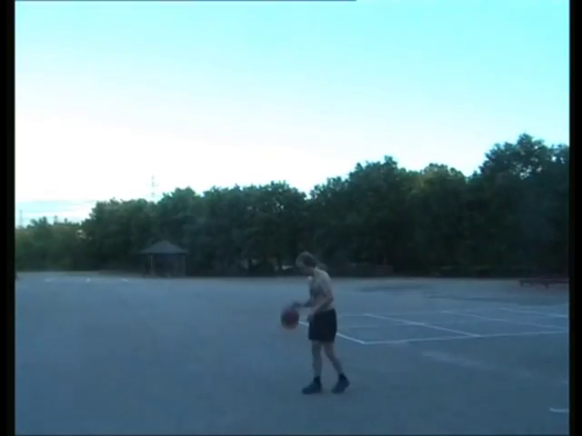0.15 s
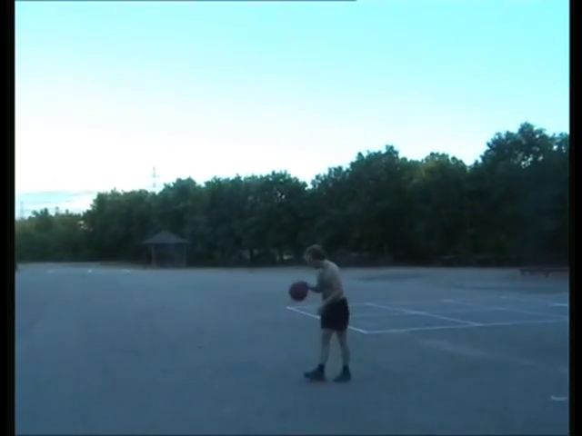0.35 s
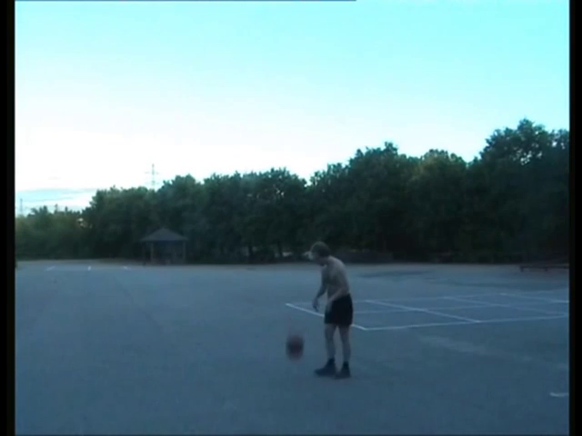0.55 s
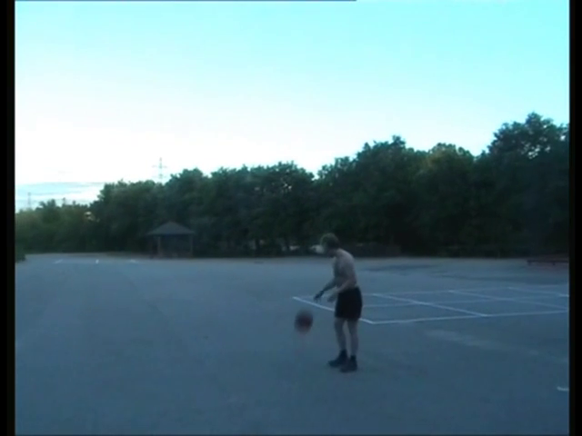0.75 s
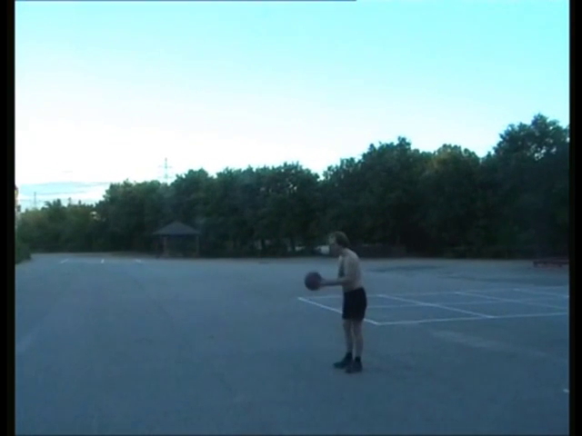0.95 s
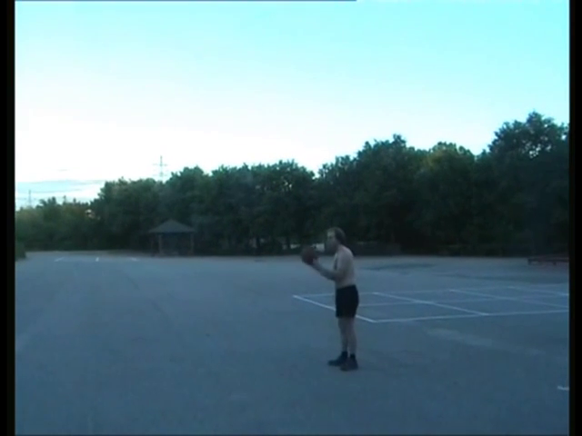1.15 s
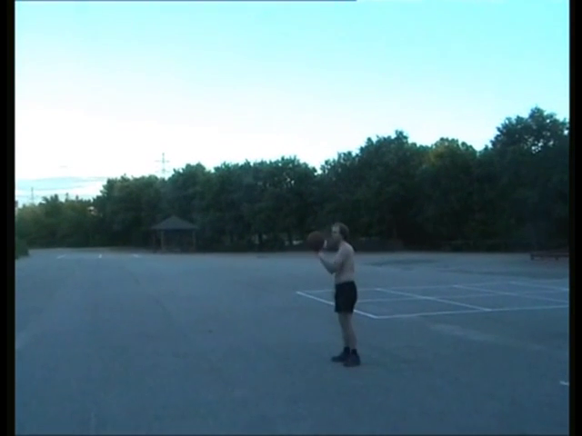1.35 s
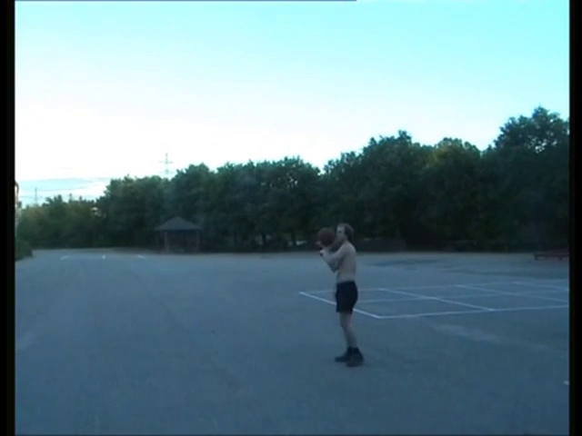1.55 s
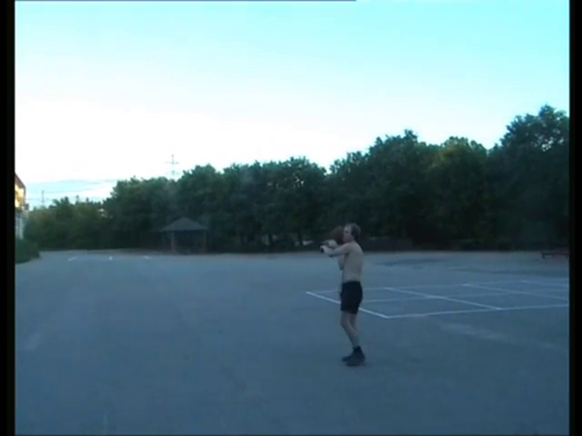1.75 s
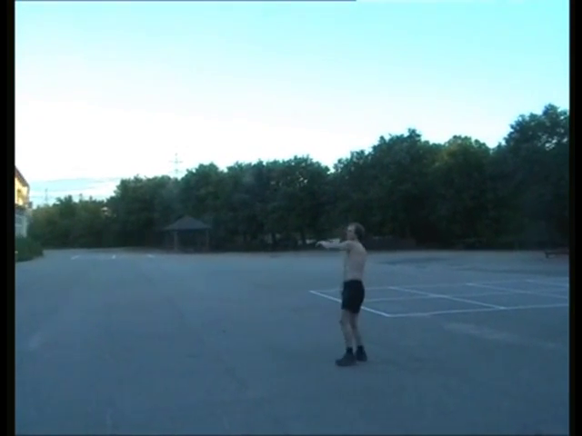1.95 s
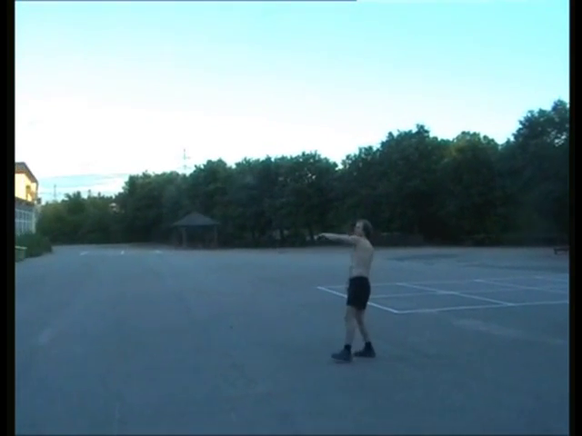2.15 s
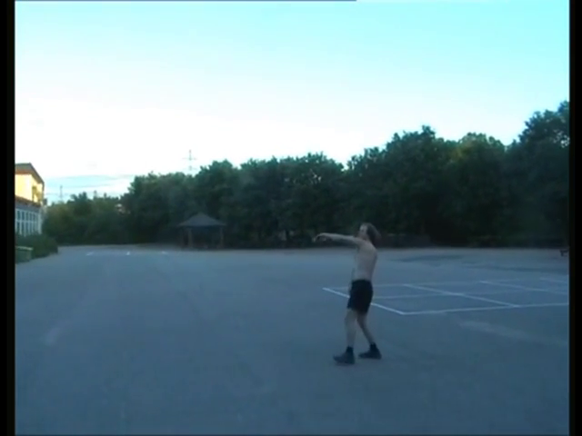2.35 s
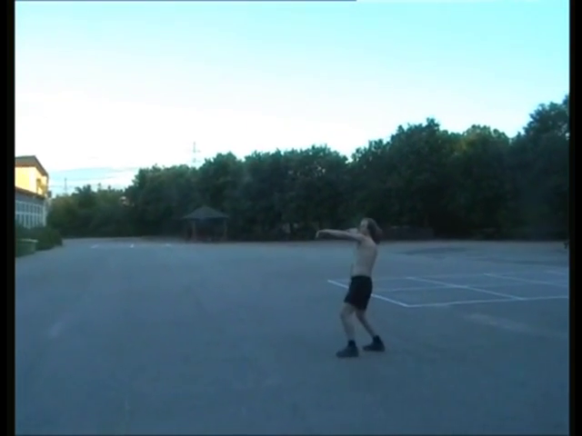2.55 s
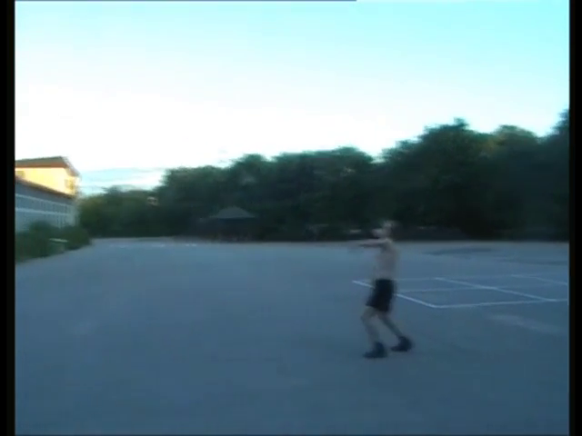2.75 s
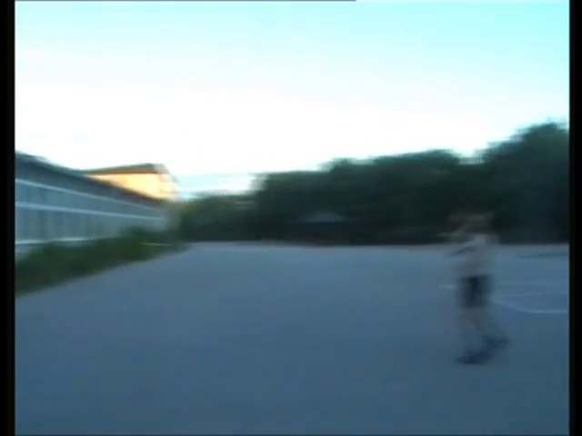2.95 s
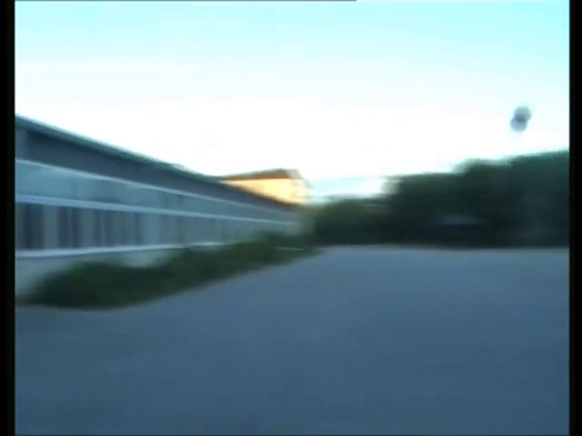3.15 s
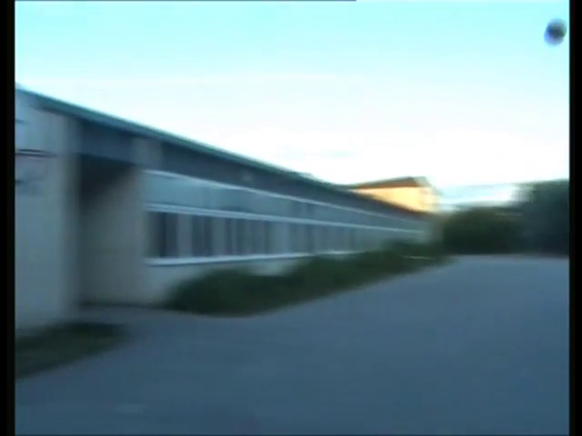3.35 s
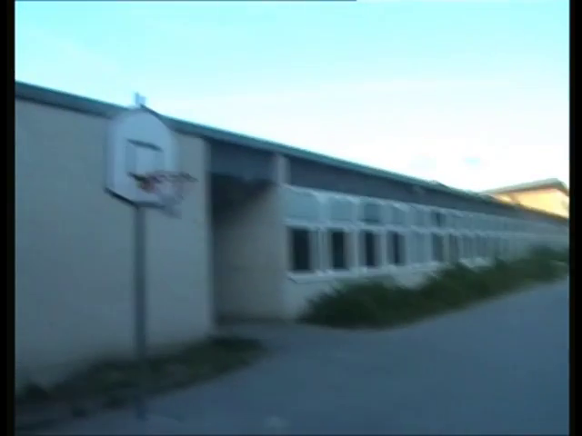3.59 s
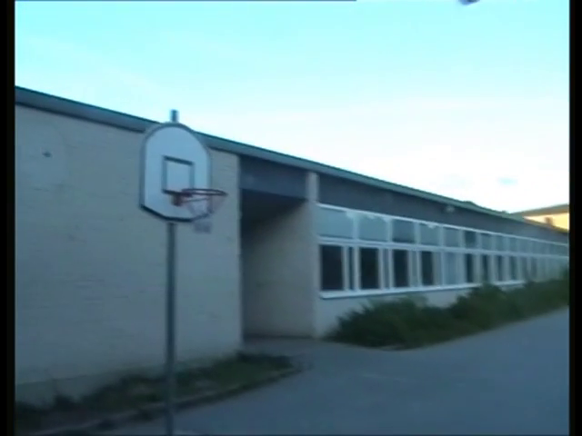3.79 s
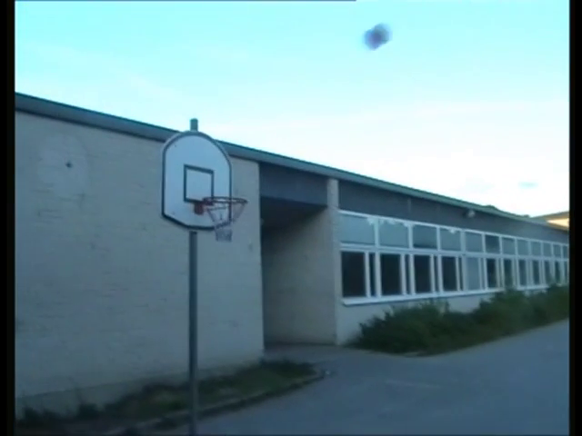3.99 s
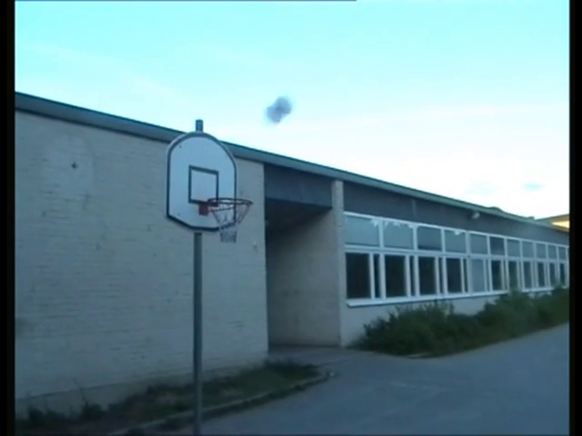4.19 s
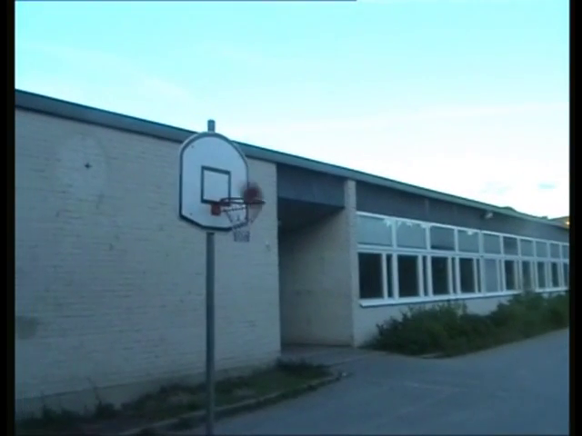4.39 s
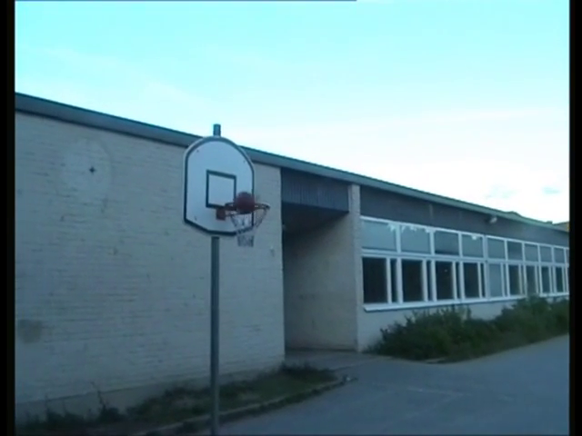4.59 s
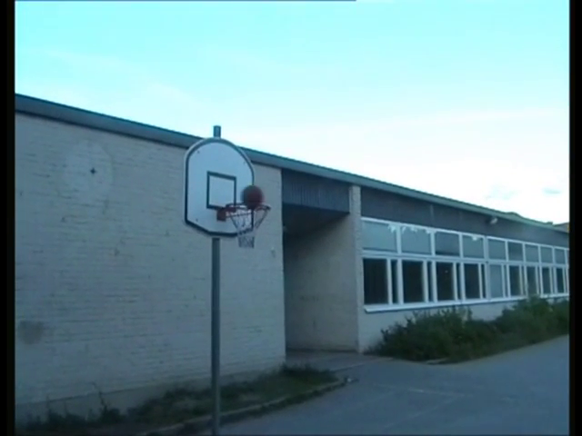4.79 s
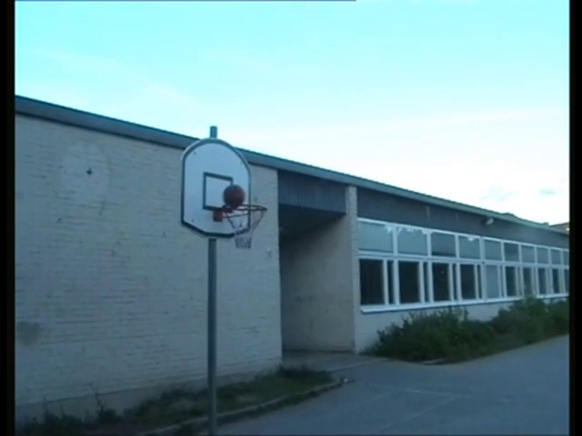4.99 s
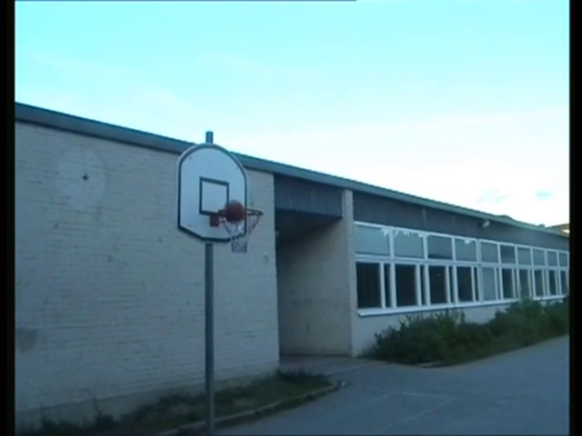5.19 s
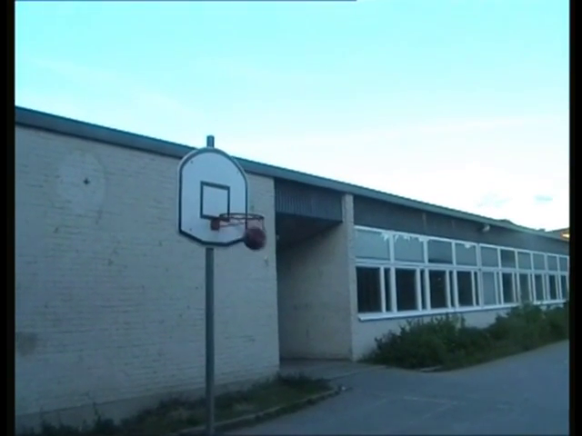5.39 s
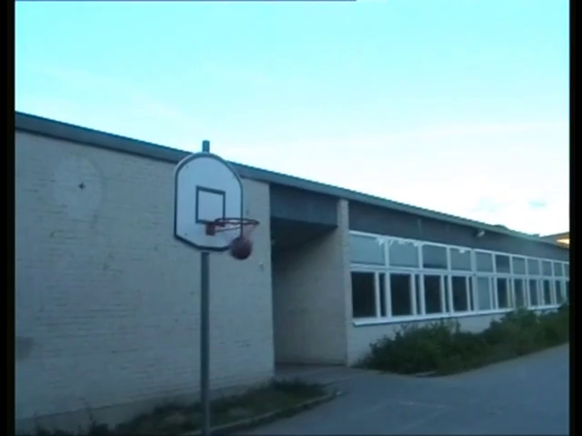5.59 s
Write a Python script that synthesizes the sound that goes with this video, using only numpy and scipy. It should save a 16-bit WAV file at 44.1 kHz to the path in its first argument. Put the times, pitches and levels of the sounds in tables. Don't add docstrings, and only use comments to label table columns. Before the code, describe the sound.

A basketball slaps asphalt once with a hollow ring and wall echo, then later rattles a loose steel hoop over steady far traffic rush.

```python
import sys
import numpy as np
from scipy import signal
from scipy.fft import rfft, irfft
from scipy.io import wavfile
from scipy.ndimage import uniform_filter1d, minimum_filter1d

SR = 44100
rng = np.random.default_rng(int(sys.argv[2]) if len(sys.argv) > 2 else 0)


def amplitude_ratio(level_db):
    exponent = np.asarray(level_db, float) / 20
    return 10 ** exponent


def persist_wave(psi):
    counts = np.round(np.clip(psi, -1, 1) * 32767).astype(np.int16)
    wavfile.write(sys.argv[1], SR, np.atleast_2d(counts).T)


N = 248724

# time in seconds, level in dB.
TRAFFIC_DENSITY = [(0.0, -23.5), (0.86, -22), (2.59, -21), (3.72, -21.5), (4.51, -21.5), (4.93, -21.5),
                   (5.34, -20.5), (5.64, -22.5)]
# frequency in Hz, level in dB per Hz.
TYRE_SPECTRUM = [(180, -19.5), (300, -11), (334, -10.5), (371, -11.5), (464, -10.5), (594, -8), (676, -2),
                 (826, 0.5), (897, -2.5), (997, 0), (1390, -6.5), (2380, -23.5), (3160, -29), (5000, -53.5),
                 (6500, -99), (11000, -120)]
# frequency in Hz, level in dB per Hz.
ENGINE_SPECTRUM = [(20, -46), (34, -15), (43, -20), (58, -23), (72, -5.5), (124, -6), (151, -8.5),
                   (204, 0.5), (235, -5), (265, -3), (299, -10.5), (337, -4.5), (376, -9.5), (600, -12),
                   (780, -34.5), (1320, -120)]
# time in seconds, pitch in Hz, level in dB.
LONE_ENGINE = [(0, 76.7, -47), (.3, 80.1, -41), (.75, 78.4, -39), (1.05, 78, -38), (1.3, 80.5, -42),
               (2.2, 84, -51)]
# frequency in Hz, level in dB per Hz.
HISS_SPECTRUM = [(2000, -16.5), (3500, -5), (4340, -10), (5500, -6), (7500, -12.5), (9500, -12.5),
                 (11000, -12.5), (14000, -23)]
# start in seconds, peak in dB, pitch in Hz, ring T60 in seconds.
BODY_TICKS = [(0.06, -28, 4500, 0.015), (0.063, -29, 4000, 0.01), (0.066, -12.5, 3160, 0.006),
              (0.0702, -15.5, 3600, 0.0086), (0.0777, 4, 2100, 0.002), (.0790, 0, 2370, 0.0016),
              (0.0852, -19, 2800, .006), (0.089, -23, 3100, 0.012), (0.103, -30, 4170, .008),
              (0.112, -14.5, 2400, 0.0056), (.1195, -33, 3800, .008), (0.2444, -28, 2870, 0.0089),
              (5.5931, -1.5, 2800, 0.0083), (5.5953, -5.5, 2420, 0.012), (5.603, -42, 4800, .05),
              (5.61, -36, 4750, 0.055), (5.619, -24, 2700, 0.034), (5.6255, -1, 2590, 0.0081),
              (5.629, -31.5, 4500, 0.06)]
# start in seconds, length in seconds, level in dB, bright part in dB.
SCUFF_STROKES = [(0.078, .012, -38.5, -4), (2.62, .1, -62, -10), (2.737, .05, -57, -2),
                 (2.94, 0.043, -54, 1.5), (3.01, .03, -55, -10), (3.124, 0.033, -54, -1),
                 (3.248, 0.15, -49.5, -9), (3.45, 0.27, -59.5, -6), (3.72, .04, -52.5, -6.5),
                 (3.8, 0.25, -56.5, -9), (4.032, 0.045, -57.5, 1.5), (4.12, .04, -56, -8),
                 (4.954, 0.034, -45, -20), (5.006, 0.011, -41, -6), (5.162, .06, -51, -5),
                 (5.227, 0.074, -49.5, 2), (5.36, 0.14, -55.5, -2.5), (5.522, 0.077, -53, -4)]
# start in seconds, peak in dB, pitch in Hz.
GRAIN_CRACKS = [(2.6424, -37, 3380), (2.7544, -35, 3600), (2.9744, -35, 3350), (3.256, -25.5, 3480),
                (3.2884, -22, 3360), (3.329, -23, 3380), (3.3574, -24, 3600), (3.3844, -30, 3420),
                (4.0544, -36, 3330), (4.9614, -32, 3560), (4.9874, -38, 3500), (5.1924, -30, 3420)]
# start in seconds, peak in dB, thump in dB, slap in dB,
# tilt of the ring in dB per octave.
BOUNCE_BLOWS = [
    (0.5495, 0, -2.5, -12.5, -0.5),
    (0.5823, -5.5, -11, -24.5, -3),
]
# frequency in Hz, level in dB,
# rise in seconds, T60 in seconds.
BALL_MODES = [(825, -3.5, 0.0015, 0.03), (1126, -1, 0.0016, 0.037), (1640, 4.5, 0.00057, 0.011),
              (2220, -10.5, 0.00088, 0.03), (2710, -11, .0004, 0.014), (3200, -7, 0.00028, 0.013),
              (3900, -5.5, 0.00028, 0.011), (4500, -6.5, .0003, 0.0084), (5300, -13, .0003, 0.011)]
# start in seconds, peak in dB, clang of the ring in dB,
# bright chatter in dB.
HOOP_JOLTS = [(4.2404, 6.5, -6.5, -23), (4.2451, -0.5, -11, -27), (4.275, -8, -11, -13),
              (4.284, -11, -1, -21), (4.301, -9, 0, -9), (4.333, -5.5, -10, -11), (4.345, -2.5, -6, -19),
              (4.356, 2, -10, -26), (4.4105, -1, -4.5, -25), (4.416, -4, -3.5, -23), (4.422, -4, -4, -7.5),
              (4.46, -1, -6, -16.5), (4.472, -12, -10, -7.5), (4.495, -10, -23, -35),
              (4.542, -21.5, 3.5, -7), (4.555, -20.5, -16, 0), (4.588, -24, -17, -32),
              (4.616, -21.5, 0, -18), (4.63, -9, -10, -11), (4.688, -2.5, -14, -25), (4.700, -11, -11, -22),
              (4.749, -5.5, -7, -20), (4.7545, 4, -16, -25), (4.764, -10, -7, -8), (4.772, -7, -12, -23),
              (4.795, -14, -15, -30)]
# time in seconds, level in dB.
BOLT_SWAY = [
    (4.241, -30),
    (4.29, -29),
    (4.412, -20.5),
    (4.49, -30),
    (4.65, -31),
    (4.806, -34),
    (4.95, -55),
]
# start in seconds, level in dB.
BOARD_PUSHES = [
    (4.241, -8),
    (4.273, -7.5),
    (4.288, -9),
    (4.412, -24),
    (4.556, -9),
    (4.664, -9),
    (4.772, -15.5),
]
# frequency in Hz, width in Hz, level in dB.
RING_PEAKS = [(1900, 58, -0.5), (2250, 136, -2), (2480, 61, -1), (2800, 200, -1), (3170, 170, 0),
              (3420, 86, 0.5), (3730, 110, -5), (4350, 350, -9.5), (4800, 290, -13.5)]
# frequency in Hz, width in Hz, level in dB.
BOLT_PEAKS = [(5020, 350, -4), (5530, 450, 0), (5900, 380, -1), (6680, 420, -4), (7630, 600, -7),
              (8700, 330, -2.5), (9580, 500, -2.5), (10500, 1200, -7.5), (11360, 700, -9.5),
              (12650, 1000, -11.5)]
# frequency in Hz, width in Hz, level in dB.
BOARD_THUD_PEAKS = [(164, 26, -3.5), (255, 39, -4), (330, 80, -8.5)]
# frequency in Hz, width in Hz, level in dB.
BOARD_PEAKS = [(434, 170, -3.5), (741, 108, 4), (1086, 195, 1.5), (1173, 47, -0.5), (1325, 67, -2),
               (1743, 130, -4.5)]
SLOWED_SLAPS_S = [4.2842, 4.292, 4.3002]
# frequency in Hz, difference in dB.
CAPSULE_LEAN = [(60, 0.5), (110, 1), (200, 1.5), (370, 2), (670, 1.5), (1230, 1.5), (2240, 2.5), (4100, 3),
                (7490, 4), (13700, 3)]
# frequency in Hz, correlation from 0 to 1.
CAPSULE_LIKENESS = [(60, 0.97), (130, 0.99), (280, 1), (610, 0.98), (1340, 0.96), (2900, 0.98),
                    (6300, 0.95), (13700, 0.94)]
# frequency in Hz, level in dB.
MICROPHONE_COLOUR = [(40, 0), (4300, 0), (5500, -1), (6260, -6), (7050, 1), (7700, 0), (8650, -6.5),
                     (9400, -1), (10100, -8), (11400, -0.5), (12400, -8), (14000, -17.5)]
# rise in dB that starts it, cut in dB per dB,
# averaging in samples.
GAIN_CONTROL = [
    (10, 2.0, 160),
    (14, .7, 64),
]
# lower edge in Hz, least level let through in dB.
TREBLE_FLOORS = [(9950, -89.5), (10450, -85.5), (11150, -81.5), (12000, -82), (12700, -76), (13500, -90)]


def rms_one(x):
    return x / np.sqrt(np.mean(x ** 2) + 1e-20)


def in_time(rows, quiet=None):
    s, *columns = np.transpose(rows)
    return [np.interp(np.arange(N) / SR, s, column, quiet, quiet) for column in columns]


def at_hz(points, hz):
    curve_hz, value = np.transpose(points)
    return np.interp(np.log(hz + 1), np.log(curve_hz + 1), value)


def coloured(x, spectrum):
    return irfft(rfft(x) * amplitude_ratio(at_hz(spectrum, np.fft.rfftfreq(N, 1 / SR))), N)


def wide_noise(spectrum):
    alike = np.clip(at_hz(CAPSULE_LIKENESS, np.fft.rfftfreq(N, 1 / SR)), 0, 1)
    mid, side = rfft(rng.standard_normal((2, N)))
    both = np.sqrt(1 + alike) * mid + np.sqrt(1 - alike) * side * [[1], [-1]]
    return rms_one(coloured(irfft(both, N), spectrum))


def band(x, low_hz, high_hz):
    edges = [low_hz, min(high_hz, .45 * SR)]
    return signal.sosfilt(signal.butter(2, edges, "band", fs=SR, output="sos"), x)


def drift(rate):
    count = int(N / SR * rate) + 2
    return np.interp(np.arange(N) * rate / SR, np.arange(count), rng.standard_normal(count))


def resonances(x, peaks, patchy_db):
    out = 0
    for k, (hz, width, db) in enumerate(peaks):
        r = np.exp(-np.pi * width / SR)
        poles = [1, -2 * r * np.cos(2 * np.pi * hz / SR), r * r]
        fed = x * amplitude_ratio(db + patchy_db * drift(75))
        out = out + (-1) ** k * signal.lfilter([1 - r * r, 0, r * r - 1], poles, fed)
    return rms_one(out)


def grit(per_s, spread_db):
    sizes = amplitude_ratio(spread_db * np.minimum(rng.exponential(1, N), 4)) * rng.choice([-1, 1], N)
    return rms_one(sizes * (rng.random(N) < per_s / SR))


def dying(s, rise_s, t60):
    out, start = np.zeros(N), int(s * SR) + 1
    age = np.arange(start, min(N, start + int(1.5 * t60 * SR))) / SR - s
    out[start:start + len(age)] = (1 - np.exp(-age / rise_s)) * amplitude_ratio(-60 * age / t60)
    return out


def struck(s, hz, rise_s, t60):
    out = dying(s, rise_s, t60)
    sounding = np.flatnonzero(out)
    out[sounding] *= -np.sin(2 * np.pi * hz * (sounding / SR - s))
    return out


def hiss():
    return amplitude_ratio(-55.5) * wide_noise(HISS_SPECTRUM)


def road():
    density_db, = in_time(TRAFFIC_DENSITY)
    rush = amplitude_ratio(density_db - 0.23) * wide_noise(TYRE_SPECTRUM)
    rumble_db = -29.5 + 1.35 * (density_db - density_db.mean())
    rumble = amplitude_ratio(rumble_db) * wide_noise(ENGINE_SPECTRUM)
    hz, drone_db = in_time(LONE_ENGINE)
    fade = np.clip(1 - (np.arange(N) / SR - 2.0) / .6, 0, 1)
    drone = np.sqrt(2) * fade * amplitude_ratio(drone_db) * np.sin(2 * np.pi * np.cumsum(hz) / SR)
    return rush + rumble + drone


def ticks():
    white, out = rng.standard_normal(N), 0
    dull = rms_one(band(white, 1300, 6600))
    bright = rms_one(band(white, 5500, 11500))
    for s, db, hz, t60 in BODY_TICKS:
        octaves = np.log2(hz / 2700)
        snap = amplitude_ratio(-9.5 + 21 * octaves) * dull + amplitude_ratio(-19 + 14 * octaves) * bright
        ring = struck(s, hz, .0001, t60) + amplitude_ratio(-4) * struck(s, 1.86 * hz, .0001, 0.43 * t60)
        out = out + amplitude_ratio(db) * (ring + snap * dying(s, .0001, 0.85 * t60))
    return out


def scuffs():
    attack_s, fall_db_per_s = .012, 148
    coarse = rms_one(band(grit(1500, spread_db=3.0), 1600, 4400))
    fine = rms_one(band(grit(6000, spread_db=1.5), 5200, 10900))
    t, out = np.arange(N) / SR, 0
    for s, length, db, bright_db in SCUFF_STROKES:
        fall_db = -fall_db_per_s * np.maximum(t - s - length, 0)
        swell = np.clip((t - s) / attack_s, 0, 1)
        grains = amplitude_ratio(fall_db) * coarse + amplitude_ratio(bright_db + 1.1 * fall_db) * fine
        out = out + amplitude_ratio(db) * swell * grains
    return out


def cracks():
    puff = rms_one(band(grit(6400, spread_db=7.5), 2500, 10000))
    out = 0
    for s, db, hz in GRAIN_CRACKS:
        ring = struck(s, hz, .0003, 0.014) + amplitude_ratio(-4) * struck(s, 1.6 * hz, .0003, .008)
        out = out + amplitude_ratio(db - 7) * (ring + amplitude_ratio(-7.5) * puff * dying(s, 0.0004, 0.018))
    return out


def yard(x):
    tail = band(rng.standard_normal((2, N)), 700, 4300) * dying(0.0018, 0.0054, t60=0.18)
    tail = tail[0] + 0.27 * tail[1] * np.array([[1], [-1]])
    tail = tail / np.sqrt(np.sum(tail[0] ** 2))
    return amplitude_ratio(-21) * signal.fftconvolve(x[None], tail, axes=1)[:, :N]


def bounce():
    contact_s = 0.0062
    white, out = rng.standard_normal(N), 0
    slap = rms_one(band(white, 2500, 6100))
    near = rms_one(band(white, 1800, 3340))
    far = rms_one(band(white, 2500, 5100))
    for s, db, thump_db, slap_db, tilt_db in BOUNCE_BLOWS:
        ring = 0
        for hz, mode_db, rise_s, t60 in BALL_MODES:
            ring = ring + amplitude_ratio(mode_db + tilt_db * np.log2(hz / 1000)) * struck(s, hz, rise_s, t60)
        push = -struck(s, 222, 0.0012, 0.033) - amplitude_ratio(-5.0) * struck(s, 132, 0.0058, 0.069)
        touching = np.interp(np.arange(N) / SR - s, [0, .0008, 0.72 * contact_s, contact_s],
                             [0.0097, 0.92, .4, 0.00099])
        scatter = amplitude_ratio(-29.5) * near * dying(s + 0.0027, 0.003, 0.16)
        scatter = scatter + amplitude_ratio(-40.5) * far * dying(s + .030, 0.025, 0.27)
        blow = ring + amplitude_ratio(thump_db) * push + amplitude_ratio(slap_db - 7.5) * slap * touching + scatter
        out = out + amplitude_ratio(db) * blow
    return out


def slaps():
    first_s, swing_s, loss_db_per_s = 4.2461, .0053, 40
    times = [*(first_s + swing_s * np.arange(7)), *SLOWED_SLAPS_S]
    spread = rng.standard_normal((len(times), 2))
    out = 0
    for s, (force, place) in zip(times, spread):
        db = -3 - loss_db_per_s * (s - first_s) + 2.5 * force
        out = out + amplitude_ratio(db) * struck(s, 910 * (1 + 0.13 * place), 0.00032, 0.0093)
    return out


def hoop():
    t60 = 0.064
    body = amplitude_ratio(in_time(BOLT_SWAY, quiet=-120)[0])
    clang, sharp = amplitude_ratio(-1.5) * body, amplitude_ratio(-8) * body
    thud = sum(amplitude_ratio(db - 11.0) * dying(s, 0.0023, 0.14) for s, db in BOARD_PUSHES)
    rim = 0
    for s, db, clang_db, chatter_db in HOOP_JOLTS:
        body = body + amplitude_ratio(db - 11.5) * dying(s, 0.0007, t60)
        clang = clang + amplitude_ratio(db + clang_db - 11.5) * dying(s, 0.00096, 1.16 * t60)
        sharp = sharp + amplitude_ratio(db + chatter_db - 7) * dying(s, 0.001, 0.82 * t60)
        thud = thud + amplitude_ratio(db - 19.5 - 9.5) * dying(s, 0.0032, 3.1 * t60)
        rim = rim + amplitude_ratio(db - 38) * struck(s, 3450, .001, 0.33)
    contacts = grit(2600, spread_db=3.5)
    contacts[[int((row[0] + .0012) * SR) for row in HOOP_JOLTS]] = 7.0
    board = thud * resonances(contacts, BOARD_THUD_PEAKS, patchy_db=1.5)
    board = board + body * resonances(contacts, BOARD_PEAKS, patchy_db=-0.5)
    chatter = sharp * resonances(contacts + grit(5000, spread_db=-1.5), BOLT_PEAKS, patchy_db=3.0)
    ring = clang * resonances(contacts, RING_PEAKS, patchy_db=3.5)
    return rim + board + ring + chatter + slaps()


def scene():
    rattle = hoop()
    return hiss() + road() + ticks() + scuffs() + cracks() + yard(rattle) + bounce() + rattle


def hush(x):
    ahead, out = int(.0055 * SR), 0
    low = signal.sosfiltfilt(signal.butter(2, 2000, fs=SR, output="sos"), x)
    for part, (start_db, share, size) in zip((low, x - low), GAIN_CONTROL):
        level_db = 10 * np.log10(uniform_filter1d(part[0] ** 2, size) + 1e-9)
        coming_db = -minimum_filter1d(-level_db, ahead, origin=-(ahead // 2))
        excess_db = np.maximum(coming_db - level_db - start_db, 0)
        out = out + part * amplitude_ratio(-share * uniform_filter1d(excess_db, size=32))
    return out


def treble_gate(x):
    hz, _, frames = signal.stft(x, SR, nperseg=1024)
    edges = [row[0] for row in TREBLE_FLOORS[1:]] + [14200]
    for (low, least_db), high in zip(TREBLE_FLOORS, edges):
        part = (hz >= low) & (hz < high)
        power = uniform_filter1d(np.mean(np.abs(frames[:, part].mean(0)) ** 2, 0), size=3)
        frames[:, part] *= power > amplitude_ratio(least_db) ** 2
    return signal.istft(frames * (hz < edges[-1])[:, None], SR)[1][:, :N]


def low_pass(x):
    return signal.sosfilt(signal.butter(12, 14290, fs=SR, output="sos"), x)


def record(dry):
    lean = np.array(CAPSULE_LEAN)
    left = coloured(dry[0], lean * [1, .5])
    right = coloured(dry[1], lean * [1, -.5])
    x = hush(coloured(np.array([left, right]), MICROPHONE_COLOUR))
    x = signal.sosfilt(signal.butter(4, 37, "high", fs=SR, output="sos"), x)
    top = 0.91
    x = 1.358 * top * np.tanh(x / (1.25 * top))
    return low_pass(treble_gate(np.clip(x, -1, 1)))


dry = scene()
out = record(dry)
persist_wave(out)
```